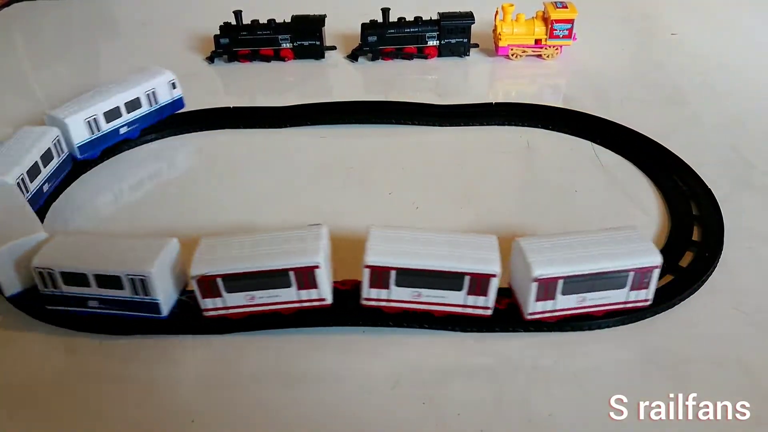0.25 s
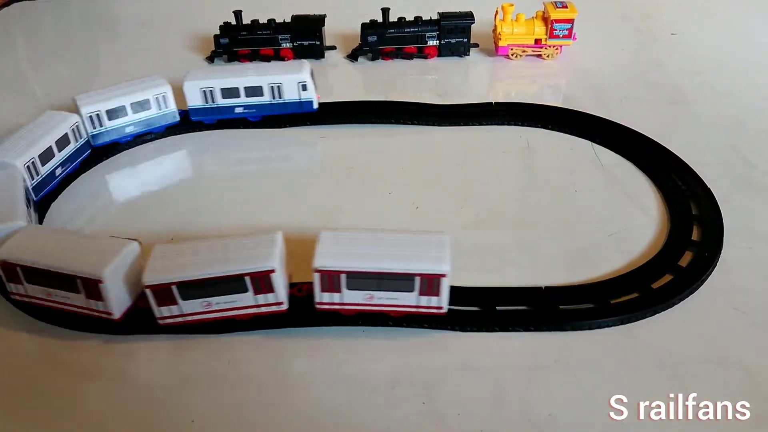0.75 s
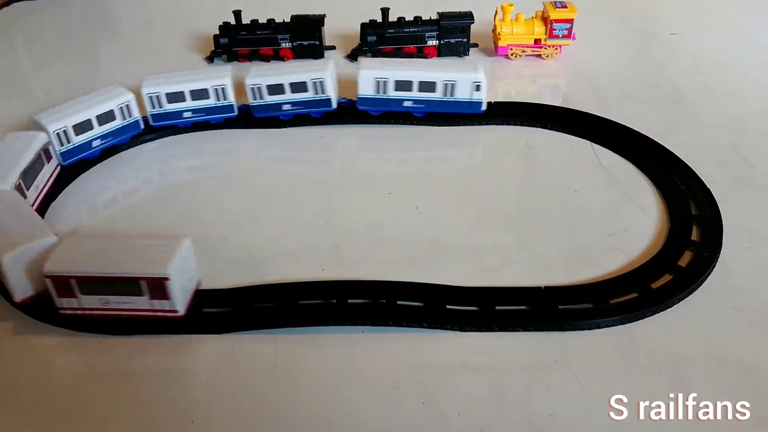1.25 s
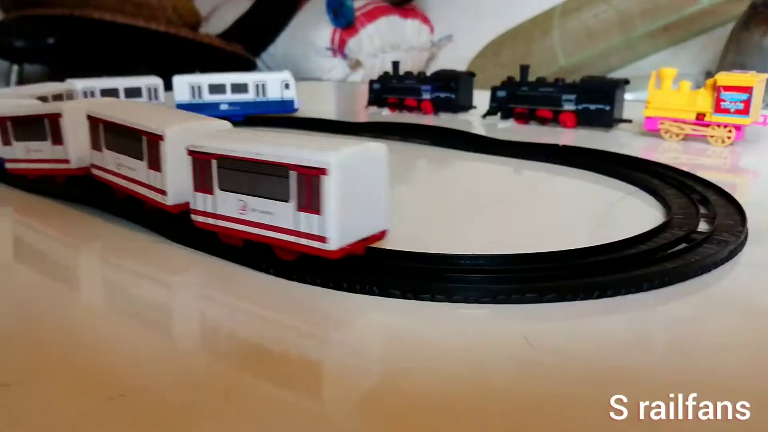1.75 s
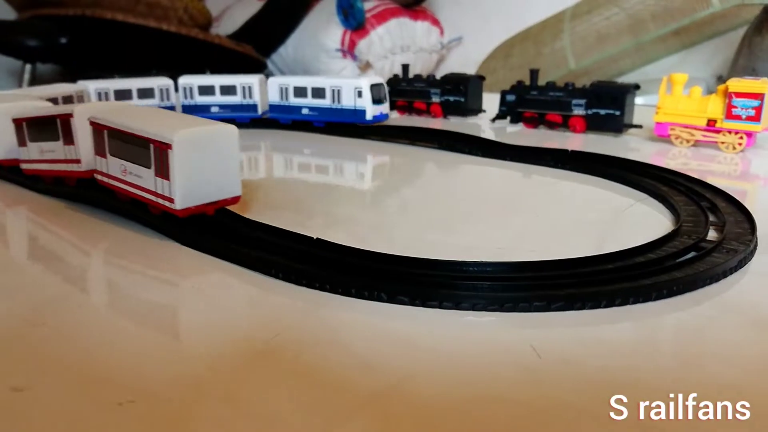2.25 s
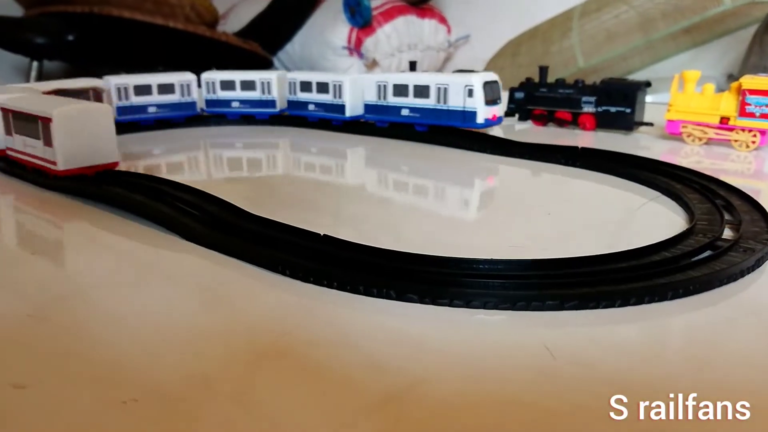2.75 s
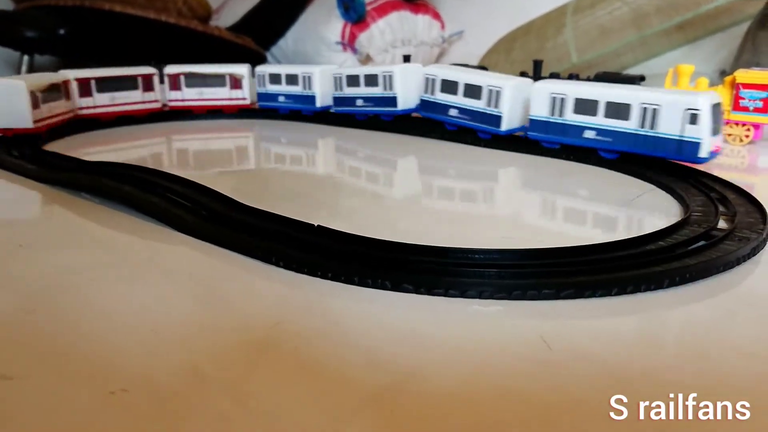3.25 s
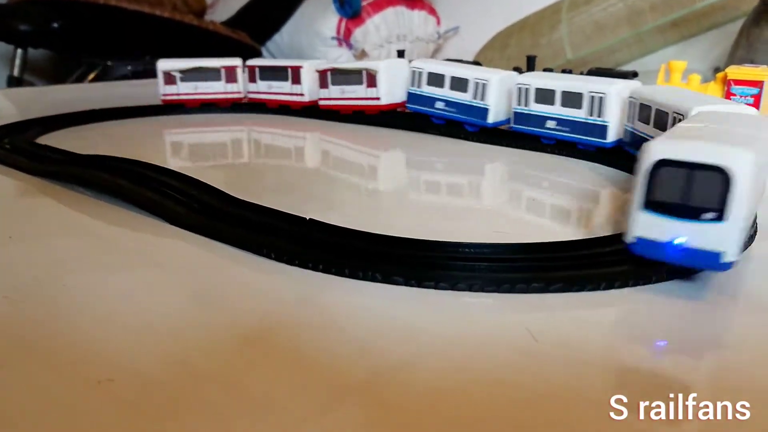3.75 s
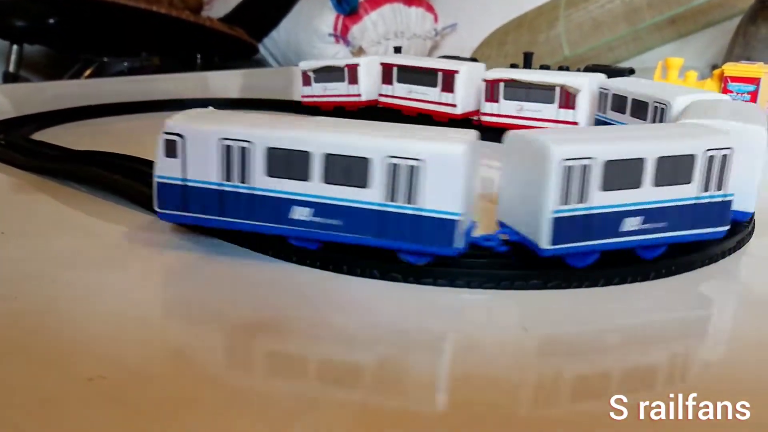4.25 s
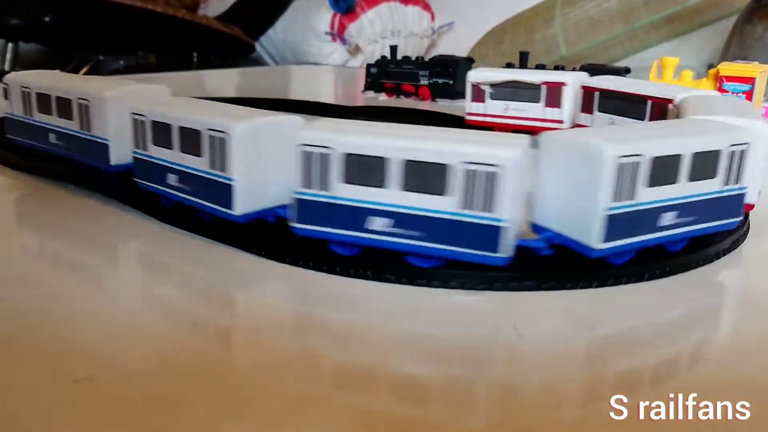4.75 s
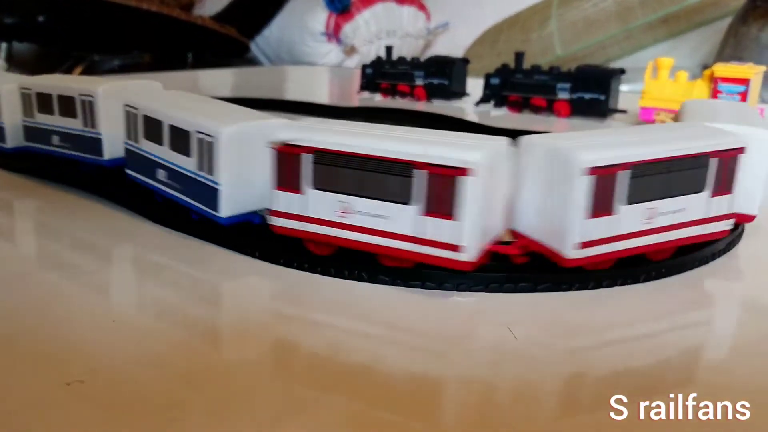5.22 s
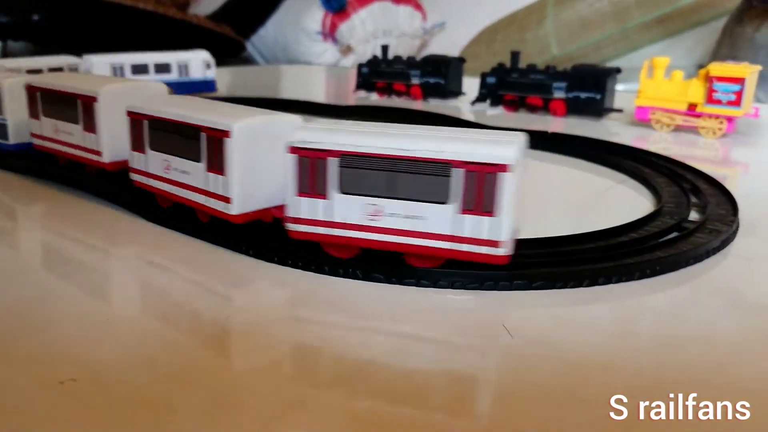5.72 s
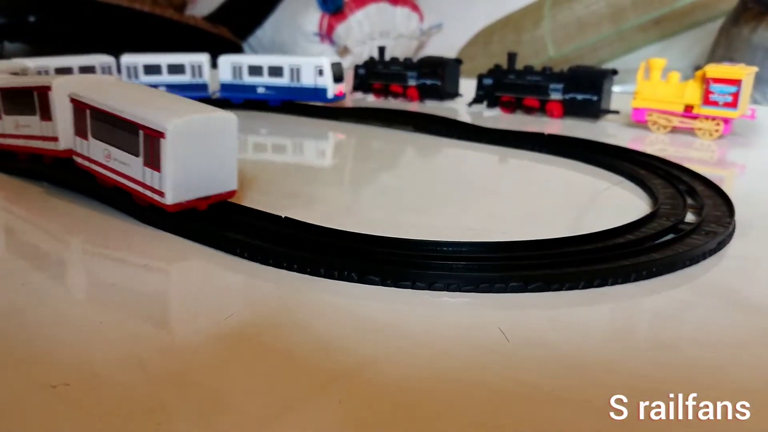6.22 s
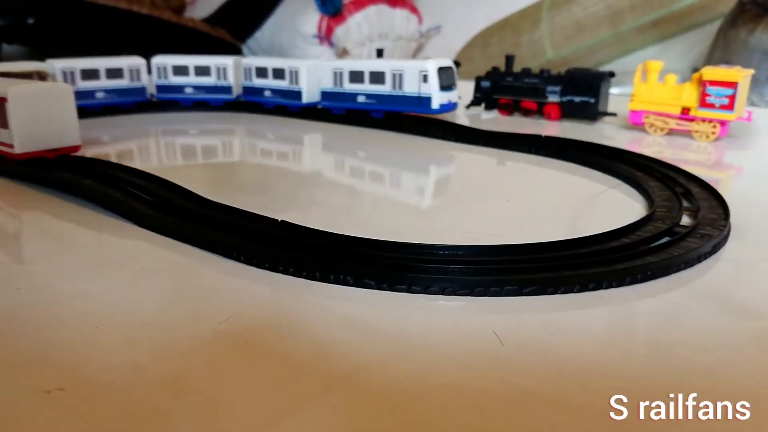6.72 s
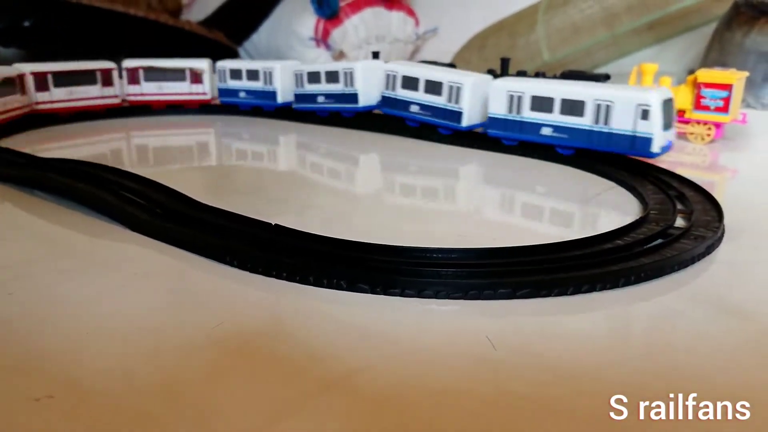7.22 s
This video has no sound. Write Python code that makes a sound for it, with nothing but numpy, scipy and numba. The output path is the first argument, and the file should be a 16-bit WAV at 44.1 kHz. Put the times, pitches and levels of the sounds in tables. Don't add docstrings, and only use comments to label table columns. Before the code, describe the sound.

Dense dry ticking of toy gears and hollow plastic cars circling a track on a hard surface, loudest mid-way as the train passes close by.

```python
import sys
import numpy as np
from scipy import signal
from scipy.fft import rfft, irfft
from scipy.io import wavfile
from scipy.ndimage import uniform_filter1d
from numba import njit

SR = 44100
rng = np.random.default_rng(int(sys.argv[2]) if len(sys.argv) > 2 else 0)


def field_ratio(decibels):
    return 10 ** (np.asarray(decibels, dtype=float) / 20)


def log_audio(samples):
    frames = np.atleast_2d(samples).T
    limited = np.clip(frames, -1, 1)
    pcm = np.round(limited * 32767).astype(np.int16)
    wavfile.write(sys.argv[1], SR, pcm)


N = 329868

# (frequency [Hz], width [Hz], level [dB])
FAN_LINES = [(92.9, 1.2, -46), (106.5, 0.91, -42), (147.5, 1.14, -48), (290.6, 6.62, -54)]
# (frequency [Hz], density [dB per Hz])
ROOM_AIR = [(15, -47), (25, -31), (54, -5.5), (81, 2), (102, -0.5), (125, -6), (190, -4.5), (232, -15),
            (400, -12.5), (520, -67.5), (880, -120)]
# (time [s], depth [dB], width [s])
HUM_FADES = [(.24, 15, 0.04), (1.58, 31, 0.18), (2.0, 21, 0.23), (2.55, 17, 0.08), (3.38, 30, 0.085),
             (3.95, 8, 0.041), (4.22, 8, 0.038), (4.62, 18, .07), (5.0, 26, 0.18), (5.58, 2, 0.18),
             (6.17, 24, 0.082), (7.17, 37, 0.063)]
# (frequency [Hz], width [Hz], level [dB])
SHELL_MODES = [(811, 150, -13.5), (1007, 100, -3.5), (1130, 114.5, 3), (1220.4, 270, 1), (1394, 437, -8.5)]
# (frequency [Hz], width [Hz], level [dB])
ROOF_MODES = [(1770, 270, 6), (2026, 182, 25), (2100, 1320, 14.5)]
# (frequency [Hz], density [dB per Hz])
TICK_COLOUR = [(1410, -24), (2400, 9), (3570, 5.5), (4220, 0.5), (4760, -6.5), (5930, -5.5), (6740, -7.5),
               (7330, -12.5), (10200, -18.5), (12000, -29.5), (13000, -65)]
# (frequency [Hz], density [dB per Hz])
TABLE_COLOUR = [(26, -29), (45, -3.5), (97, -3), (130, -7.5), (167, 0.5), (243, -7), (413, -8.5),
                (644, -8.5), (800, -4.5), (1040, -16.5), (1760, -120)]
# (time [s], level [dB])
MOTOR_NEARNESS = [(0, -26), (.6, -31), (1.15, -29), (1.71, -26), (1.74, -30), (1.87, -31), (1.94, -35),
                  (2.25, -34.5), (2.6, -32), (2.97, -32.5), (3.02, -28.5), (3.9, -25), (4.45, -25),
                  (4.85, -22.5), (5.4, -25), (6.25, -33), (7.33, -28), (7.48, -30)]
# (time [s], level [dB])
WHEEL_NEARNESS = [(0, -38.5), (.36, -37.5), (.55, -45), (1.7, -39.5), (1.76, -37.5), (1.87, -39.5),
                  (1.95, -47.5), (2.35, -47), (2.7, -43), (2.97, -41.5), (3.02, -41.5), (4.0, -38.5),
                  (4.8, -36.5), (5.4, -36.5), (5.7, -40.5), (5.95, -40), (6.15, -46), (7.48, -39)]
# (time [s], level [dB])
ROOF_FACING = [(0, -0.5), (.5, -2), (1.71, 1.5), (1.73, 1), (7.1, -0.5), (7.3, 2.5)]
# (time [s], level [dB])
JINGLE_LEVEL = [(0, -45), (.3, -43), (.45, -49), (.6, -70)]
# (centre [s], energy [dB], shell relative level [dB],
# length [ms])
JOINT_CLACKS = [(0.1036, -0.5, 6, 2.5), (0.1507, 2, -4, 3.8), (0.1556, -10, 1, 2.4),
                (0.271, 6, -3, 5.4), (0.2907, -2, 8, 2.5), (0.3081, 2.5, 3, 3.5), (0.3525, 0, 1, 2.9),
                (0.4557, -7, 1.0, 5.5), (0.5435, -10, 2, 2.5), (0.8231, -8, 3.0, 3.7),
                (0.9551, -2, 10, 2.9), (1.0234, -4.5, 8, 1.9), (1.0547, -8, 15, 6.4),
                (1.0855, -17, 9, 2.0), (1.1706, -9, 7, 4.0), (1.3049, -5, -6.0, 6.1),
                (1.3269, -6, 9, 5.8), (1.335, -6, 0, 5.0), (1.424, -20, 4, 2.5),
                (1.4602, -19, 9.0, 3.0), (1.4726, -18, -4.0, 3.0), (1.5749, -5.5, 6, 4.4),
                (1.6024, -15, 8, 4.5), (1.6725, -12, 0, 2.5), (1.7874, 3, 0, 4.6),
                (1.7928, 1, -4, 2.6), (1.8297, 6, -1, 7.4), (1.8428, -5, -2, 4.0),
                (2.003, -0.5, 4, 2.8), (2.0137, -14, 15, 2.5), (2.0232, -20, -3.0, 2.5),
                (2.0961, -6, 13, 2.8), (2.1057, -1, 8, 2.5), (2.117, 0, 0, 3.9), (2.1372, -5, 2, 1.7),
                (2.1773, -1, 1, 2.5), (2.1855, 1.5, -11, 1.8), (2.1997, -5, -2, 3),
                (2.397, -8, -3, 2.0), (2.5204, -6, -10.0, 2.2), (2.5614, -15, 3.0, 5.0),
                   (2.5685, -7, 10, 4.5), (2.5848, -5, -12.0, 2.7), (2.6006, -7, -1.0, 3.4),
                   (2.6155, -5.5, 2, 2.2), (2.6298, -1, 12, 3), (2.6497, -3, -4, 6.9),
                   (2.6911, -17, -7.0, 2.5), (2.6981, -2.5, 7.0, 2.3), (2.706, -15, -4, 3.0),
                   (2.734, -4, 11, 2.5), (2.7655, -9, 18, 3.0), (2.793, 4, 2, 2.5), (2.8032, -12, 10, 2.0),
                   (2.8608, -4, 12, 3.6), (3.0064, -3, 4, 3.2), (3.0156, -4, 8, 2.0), (3.0275, -1, 4, 2.7),
                   (3.0357, -1.5, 5, 2.5), (3.0483, -1, 9, 1.6), (3.073, -3, -3.0, 2.5), (3.0948, 1, -1, 7),
                   (3.1833, -8, 0.0, 3.9), (3.206, -9, -7.0, 3.0), (3.253, -6, 2.0, 5.0),
                   (3.3078, 2.5, 7.0, 3.5), (3.3505, 0.5, 10, 4), (3.461, -11.0, 7, 0.5),
                   (3.509, -1, -1, 4.5), (3.5964, -12, -8.0, 4.1), (3.601, -8.0, 2.0, 2.5),
                   (3.6468, -10, 7, 3.3), (3.6713, 0.5, 14, 2.7), (3.701, 2, 11, 2.8),
                   (3.7059, -5, -7, 2.3), (3.751, -4.5, 10.0, 1.8),
                (3.7679, -15, 1.0, 2.6), (3.8087, -7, 5, 3.0), (3.8218, -3, 14, 2.0),
                   (3.8273, 10.5, 7, 4.8), (3.845, -6, 4, 2.5), (3.8761, 8, 7.5, 3.0), (3.9248, 1, 10, 3.2),
                   (3.968, 3.5, 6.0, 2), (4.002, -7, -7, 2.5), (4.0186, 1.5, -1, 5.1),
                   (4.0356, -17, -5.0, 2.5), (4.0469, 7, -3, 3.0), (4.0587, 2, -8, 3.2),
                   (4.1381, 10, -2, 2.7), (4.1488, 5, 7, 2.5), (4.18, -9, -7.0, 3.0),
                   (4.2446, 5.5, -7.0, 2.5), (4.2585, -6, 12, 4.0), (4.27, -2, -6.0, 3.0),
                   (4.3112, 4, -4.0, 4.8), (4.3168, -5, 3, 2.0), (4.3315, -11, 11, 2.0),
                   (4.349, 0.5, 0, 3.5), (4.3755, -3.5, -6, 1.8), (4.485, 2, -5, 3.9),
                   (4.515, -6.0, 9, 4.0), (4.6486, -5.0, 4.0, 3.5), (4.7099, -3, 2, 3.0),
                   (4.7714, 1, -6.0, 2.8), (4.786, -6, 9, 2.0), (4.871, 3, 7, 4.5), (4.8857, -5, 8, 4.0),
                   (4.92, 0, 9.0, 4.0), (4.9443, 0, -7.0, 5.1), (5.101, -4.5, -8, 4.0),
                   (5.1457, -7.0, -4, 2.0), (5.163, -4, 10, 4.5), (5.2763, -3, -8.0, 2.5),
                (5.33, -2, 5, 3.0), (5.3663, -9, 6.0, 2.0), (5.407, -14, 3.0, 2.5), (5.4257, -2, 4, 3.0),
                   (5.448, -6, 7.0, 2.5), (5.459, -2, -8.0, 4.4), (5.468, -7, -5.0, 4.5),
                   (5.518, -17, 0, 3.0), (5.6711, -0.5, 0, 9.8), (5.7248, -10.0, 13, 2.5),
                   (5.795, -12, 12, 4.5), (5.8709, -11.0, 6, 2.5), (5.8764, -4, 8, 2.5),
                   (5.8895, -2.5, 5, 3.2), (5.975, -4, -8.0, 4.0), (6.271, -8, 3, 2.7),
                   (6.4836, -10, 0.0, 3.5), (6.516, -11, 14, 4.1), (6.5728, -20, -6.0, 2.5),
                   (6.5963, -9, 8, 2.5), (6.6017, -8, 9, 2.2), (6.6494, -3, 6, 2.2), (6.718, -11, 11, 3.5),
                   (6.742, -15, -8, 2.5), (6.7504, -4, 12, 2.5), (6.7743, -5, -9.0, 5.0),
                   (6.814, -8, 13, 2.3), (6.8446, -5, 11.0, 2.2), (6.88, -20, 4, 4), (6.889, -5, -1, 2),
                   (7.1151, -5, 2, 2), (7.1473, 8.5, 3.0, 5), (7.233, -3, 6.0, 2.2),
                   (7.2384, -2, -7.0, 2.0), (7.254, -5, 1, 3.4), (7.2636, 5, 4, 3.6), (7.294, -2, 5, 4.0),
                (0.141, -8, -2, 3.5), (0.335, -5, 0, 6), (0.44, -14, 0, 4), (3.2995, -1, 2, 4),
                  (3.865, -7, 0, 1.5), (3.8794, 4, 5, 2), (3.907, -1, 2, 3), (4.281, -8, 1, 1.5),
                  (7.123, -4, -3, 2.5), (7.21, -4, 2, 5), (7.275, -10, 0, 2), (7.42, -8, 17, 3)]
# (time [s], peak [dB], frequency [Hz])
RIM_SNAPS = [(0.232, -21, 1130), (0.94, -13, 1210), (1.083, -23, 1110), (1.24, -17, 1280),
             (1.32, -13, 1080), (1.5, -17, 1120), (1.736, -23.5, 1190), (1.831, -17, 1230),
             (2.137, -19, 1290), (2.567, -17, 1200), (2.697, -22, 1200), (2.764, -17, 1170),
             (3.34, -14, 1190), (3.458, -17, 1210), (3.566, -17, 1090), (3.607, -13, 985), (3.7, -10, 1040),
             (3.735, -21, 1025), (3.749, -14, 1330), (3.809, -12, 1100), (3.826, -14, 1130),
             (3.866, -9, 1200), (3.878, -6.5, 1130), (3.923, -9, 1070), (3.968, -14, 1080),
             (4.016, -13, 1190), (4.043, -17, 1040), (4.214, -18, 1070), (4.26, -12, 1160),
             (4.284, -15, 958), (4.395, -10, 1180), (4.414, -10, 1110), (4.617, -14, 1150),
             (4.704, -20, 1170), (4.755, -15, 1100), (4.777, -10, 1100), (4.851, -11, 1090),
             (4.884, -14, 996), (4.903, -10, 1090), (4.927, -9, 1140), (4.957, -17, 1000),
             (4.981, -13, 1220), (5.135, -8.5, 1070), (5.258, -15, 1080), (5.471, -21, 1150),
             (5.504, -16, 1160), (5.589, -16, 1200), (5.645, -16, 1180), (6.447, -15.5, 1040),
             (6.516, -19, 1100), (6.595, -24, 1090), (6.716, -21, 1200), (6.749, -19, 1060),
             (6.886, -19, 1170), (7.043, -15, 1130), (7.148, -12, 1140), (7.232, -18, 1180),
             (7.263, -21, 1150), (7.29, -18, 1120), (7.303, -10, 1200),
             (2.731, -23, 1130),
    (3.003, -20, 1270),
    (3.871, -9, 1020),
    (4.783, -14, 1100),
    (4.796, -12, 1080),
    (4.815, -16, 1170),
    (4.866, -14, 980),
    (7.317, -13, 1350),
    (7.335, -14, 1070),
]
# (time [s], energy [dB])
COUPLING_JOLTS = [(0.2479, -4), (0.26, 1), (0.5574, 0), (0.5907, -7), (0.604, -3), (0.701, 5), (0.849, 2),
                  (0.894, 6), (0.9164, 8), (0.9403, 0), (0.9664, 6), (1.013, 2), (1.104, -6), (1.2467, -4),
                  (1.3883, -4), (1.501, 6), (1.7073, -2), (1.8003, 6), (2.25, -5), (2.334, -8), (2.4436, 1),
                  (2.547, 0), (2.7373, 0), (3.1, -4), (3.1897, 9), (3.34, 5), (3.356, 8), (3.3752, 7),
                  (3.465, 1), (3.524, 6), (3.5674, 8), (3.6058, 11), (4.2322, 8), (4.3956, 0), (4.413, 5),
                  (4.615, 5), (4.7552, 4), (4.7976, 8), (4.903, 3), (4.9258, 0), (5.171, 0), (5.3865, 6),
                  (5.5564, -10), (5.5895, 0), (5.6442, -4), (5.661, -3), (5.8813, 2), (5.9093, 5),
                  (6.035, 3), (6.103, -7), (6.157, -9), (6.206, 1), (6.3533, -1), (6.4472, -5),
                  (6.6663, -7), (6.73, -7), (6.866, -4), (7.04, 5), (7.2093, 3), (7.3017, 13)]
# (time [s], level [dB], frequency [Hz])
TABLE_THUDS = [
    (1.752, -23, 110),
    (1.793, -26, 142),
    (1.83, -18.5, 157),
    (2.42, -26, 139),
]
# (start [s], length [s], level [dB], frequency [Hz])
AXLE_SQUEAKS = [
    (3.283, 0.042, -69, 15500),
    (4.129, 0.068, -65, 15600),
    (4.232, 0.032, -74, 14700),
    (4.364, 0.066, -61, 15500),
    (4.869, 0.074, -59, 15400),
]
# (frequency [Hz], left minus right [dB])
PORT_DIFFERENCE = [(60, -5), (110, -5), (200, -5.5), (380, -4.5), (700, -5), (1290, -6.5), (2380, 0.5),
                   (4400, -8.5), (8120, 2.5), (15000, 4.5)]
# (frequency [Hz], share [0-1])
TREBLE_LOSS = [(6500, 0), (8000, .1), (9500, .22), (10500, .45), (11300, .62), (12200, .78), (12800, .97)]
# low edge, high edge [Hz]
MIC_BAND = [48, 12400]

CHANGE_S = 1.7207
ROOF_DB, TICK_DB, TABLE_DB = (4.23, 1.73), (5, 6.16), (0, 3)
ROOF_FROM_WHEELS = 0.75
LAG_MS = -0.16


def unit(x):
    return x / np.sqrt(np.mean(x ** 2))


@njit
def svf(x, hz, width):
    y, b, l = np.empty(len(x)), 0., 0.
    g, k = np.tan(np.pi * hz / SR), width / hz
    for i in range(len(x)):
        v = (b + g * (x[i] - l)) / (1 + g * (g + k))
        b, l, y[i] = 2 * v - b, l + 2 * g * v, k * v
    return y


def ring(x, modes):
    return sum((-1) ** k * field_ratio(db) * svf(x, 1. * f, 1. * w) for k, (f, w, db) in enumerate(modes))


def ring_twice(x, hz, width):
    return ring(ring(x, [(hz, width, 0)]), [(hz, width, 0)])


def colour(x, points, ends=-120., size=4096):
    hz, db = np.transpose(points)
    f = np.log(np.arange(size // 2 + 1) * SR / size + 1)
    if ends:
        hz, db = np.r_[hz[0] / 2, hz, hz[-1] * 2], np.r_[ends, db, ends]
    cepstrum = irfft(np.interp(f, np.log(hz), db) * np.log(10) / 20)
    cepstrum[1:size // 2] *= 2
    cepstrum[size // 2 + 1:] = 0
    return signal.fftconvolve(x, irfft(np.exp(rfft(cepstrum))))[:N]


def walk(rate):
    place = np.arange(N) * rate / SR
    levels = rng.standard_normal(int(place[-1]) + 2)
    k = place.astype(int)
    part = place - k
    ease = part * part * (3 - 2 * part)
    return 1.15 * (levels[k] + (levels[k + 1] - levels[k]) * ease)


def follow(curve):
    return np.interp(np.arange(N) / SR, *np.transpose(curve))


def wavering(hz, width, sway_db=-0.44):
    turns = np.cumsum(hz + width * walk(9) / 2) / SR + rng.random()
    return unit(field_ratio(sway_db * walk(6.9)) * np.sin(2 * np.pi * turns))


def fan():
    t = np.arange(N) / SR
    fade_db = sum(db * np.exp(-((t - s) / wide) ** 2) for s, db, wide in HUM_FADES)
    lines = sum(field_ratio(db) * wavering(hz, width) for hz, width, db in FAN_LINES)
    lines = lines + field_ratio(-41.5 - fade_db) * wavering(176.3, 2.34, sway_db=1.0)
    mid, side = (field_ratio(-43) * unit(colour(rng.standard_normal(N), ROOM_AIR)) for _ in range(2))
    apart = field_ratio(-7.5) * side + field_ratio(-19.0) * np.roll(lines, N // 3)
    return lines + mid + apart * np.array([[1], [-1]])


def ticks(rate, scatter_db, hiss, patchy_db):
    hit = rng.random(N) < rate / SR
    size = field_ratio(scatter_db * np.minimum(rng.exponential(size=N), 3))
    scrape = np.convolve(hit * size, np.hanning(40), "same") * rng.standard_normal(N)
    return field_ratio(patchy_db * walk(16)) * (unit(scrape) + hiss * rng.standard_normal(N))


def rolling(shell_db, roof_db, tick_db, table_db):
    contact = ticks(600, scatter_db=3, hiss=.6, patchy_db=.9)
    shell = unit(ring(ring(contact, [(1120, 1100, 0)]), SHELL_MODES))
    roof = unit(ring(ring(contact, [(1910, 1230, 0)]), ROOF_MODES))
    direct = unit(colour(contact, TICK_COLOUR))
    table = unit(colour(contact + 2.77 * rng.standard_normal(N), TABLE_COLOUR))
    over_shell = field_ratio(roof_db) * roof + field_ratio(tick_db) * direct + field_ratio(table_db) * table
    return field_ratio(shell_db) * (shell + over_shell)


def jingle():
    def one_port():
        small = ticks(250, scatter_db=3, hiss=.3, patchy_db=2)
        return unit(ring(small, [(3520, 360, -2), (4270, 500, 0)]))
    return field_ratio(follow(JINGLE_LEVEL)) * np.array([one_port() for _ in range(2)])


def chatter():
    luck = rng.random((int(30 * N / SR), 4))
    s = luck[:, 0] * N / SR
    near_db = np.interp(s, *np.transpose(WHEEL_NEARNESS))
    energy_db = near_db + 18.5 - 5 * np.log(luck[:, 1] + 0.1)
    shell_db = 1 + 16 * (luck[:, 2] - .5)
    return np.c_[s, energy_db, shell_db, 2.9 * 3 ** luck[:, 3]]


def hollow(x):
    return ring(ring(x, [(1200, 820, 0)]), [(1080, 150, 15.6), (1214, 130, 17.7), (1440, 430, 14.0)])


def clacks():
    clear = np.array(JOINT_CLACKS)
    clear = clear + [0, -4.5, 0, 0]
    s, energy_db, shell_db, ms = np.vstack([clear, chatter()]).T
    span = np.clip(.45 * ms, .3, 4)[:, None] * SR / 1000
    age = (np.arange(800) - 400) / span
    bursts = rng.standard_normal((len(s), 800)) ** 5 * np.exp(-age ** 2 / 2)
    bursts = uniform_filter1d(bursts, size=2, axis=1)
    bursts /= np.sqrt((bursts ** 2).sum(axis=1, keepdims=True))
    at = np.maximum(s[:, None] * SR - 405, 0).astype(int) + np.arange(800)
    crack, shell = np.zeros((2, N + 800))
    np.add.at(crack, at, field_ratio(energy_db)[:, None] * bursts)
    np.add.at(shell, at[:, 350], field_ratio(np.minimum(energy_db + shell_db, energy_db / 2 + 4)))
    crack = crack[:N]
    bright = field_ratio(-1.0) * colour(crack, TICK_COLOUR)
    for hz, db in [(1500, 1.0), (2700, -7.5), (3900, -2.5), (5500, -9.5)]:
        bright = bright + field_ratio(db) * ring_twice(crack, hz, 2200)
    return bright + hollow(shell[:N]) + field_ratio(3.5) * colour(crack, TABLE_COLOUR)


def snaps():
    s, db, hz = np.transpose(RIM_SNAPS)[:, :, None]
    age = np.arange(600) / SR
    rise_ms, fall_ms = 0.83, 2
    shape = (1 - np.exp(-(1000 * age / rise_ms) ** 2)) * np.exp(-1000 * age / fall_ms)
    at = (s * SR).astype(int) + np.arange(600)
    body, edge = np.zeros((2, N + 600))
    np.add.at(body, at, field_ratio(db - 2.5) * shape / shape.max() * np.sin(2 * np.pi * hz * age))
    np.add.at(edge, at[:, 30], field_ratio(db[:, 0] - 4))
    edge = edge[:N]
    return body[:N] + ring(edge, [(2200, 2000, 0)]) + ring(edge, [(5000, 3500, -7)])


def knocks():
    s, db = np.transpose(COUPLING_JOLTS)
    jolts = np.zeros(N)
    np.add.at(jolts, (s * SR).astype(int), field_ratio(db - 6))
    return hollow(jolts)


def bumps():
    t, out = np.arange(N) / SR, 0
    for s, db, hz in TABLE_THUDS:
        age = np.maximum(t - s, 0)
        out = out + field_ratio(db) * np.sin(2 * np.pi * hz * age) * np.exp(-age / 0.0082)
    return out


def squeaks():
    out = np.zeros(N)
    for s, long, db, hz in AXLE_SQUEAKS:
        hiss = ring_twice(rng.standard_normal(4096), hz, 600)[:int(long * SR) + 600]
        at = int(s * SR) - 450
        out[at:at + len(hiss)] += field_ratio(db + 1.5) * np.hanning(len(hiss)) * unit(hiss)
    return out


def ports(x, lag_ms, pan_db, wet, t60, size=4096):
    t = np.arange(size) / SR
    late = np.interp(np.arange(N) - lag_ms * SR / 1000, np.arange(N), x)
    count = N // size + 2
    padded = np.pad(x, (size, 2 * size))
    pieces = np.lib.stride_tricks.sliding_window_view(padded, 2 * size)[::size][:count]
    tails = rng.standard_normal((2, count, size)) * field_ratio(-60 * t / t60) * np.minimum(t / 0.0016, 1)
    tails /= np.sqrt((tails ** 2).sum(axis=2, keepdims=True))
    faded = pieces[None] * np.sqrt(np.hanning(2 * size))
    wets = signal.fftconvolve(np.float32(faded), np.float32(tails), axes=2)
    echo = np.zeros((2, (count + 4) * size))
    for k in range(count):
        echo[:, k * size:k * size + wets.shape[2]] += wets[:, k]
    mix = np.sqrt(1 - wet) * np.array([late, x]) + np.sqrt(wet) * echo[:, size:size + N]
    return mix * field_ratio(np.array([pan_db, -pan_db]) / 2)


def scene():
    room = fan()
    motor_db = follow(MOTOR_NEARNESS)
    wheels_db = follow(WHEEL_NEARNESS) - motor_db
    later = (np.arange(N) / SR > CHANGE_S).astype(int)
    roof_db = ROOF_FROM_WHEELS * wheels_db + np.take(ROOF_DB, later) + follow(ROOF_FACING)
    tick_db = wheels_db + np.take(TICK_DB, later)
    table_db = wheels_db + np.take(TABLE_DB, later)
    levels = (motor_db + 2.5, roof_db, tick_db, table_db)
    pan_db = np.full(N, -1.1)
    front = ports(rolling(*levels), LAG_MS, pan_db, wet=0.36, t60=0.07)
    rear = ports(rolling(*levels), LAG_MS + 0.083, pan_db, wet=0.44, t60=0.15)
    hits = clacks() + snaps() + knocks()
    hit_pan_db = 5.5 * walk(42)
    hits = ports(hits, LAG_MS + 0.073, hit_pan_db, wet=0.1, t60=0.045)
    return field_ratio(-4.0) * front + field_ratio(-5.0) * rear + hits + room + bumps() + jingle()


def starve(x, size=2048, count=12):
    f, _, z = signal.stft(x, SR, nperseg=size, noverlap=size // 2)
    share = np.interp(f, *np.transpose(TREBLE_LOSS))[:, None]
    chance = rng.random((len(f) // count + 1, z.shape[2]))
    chance = np.repeat(chance, count, axis=0)[:len(f)]
    kept = (chance > share) / np.sqrt(1 - share)
    return signal.istft(z * kept, SR, nperseg=size, noverlap=size // 2)[1][:, :N]


def low_pass(x):
    return signal.sosfilt(signal.butter(12, 15800, fs=SR, output="sos"), x)


def record(dry):
    hz, db = np.transpose(PORT_DIFFERENCE)
    left = colour(dry[0], np.c_[hz, db / 2], ends=0)
    right = colour(dry[1], np.c_[hz, -db / 2], ends=0)
    x = np.array([left, right])
    x = .8 * np.tanh(x / .8)
    x = signal.sosfilt(signal.butter(3, MIC_BAND[0], "high", fs=SR, output="sos"), x)
    x = signal.sosfilt(signal.ellip(8, .5, 50, MIC_BAND[1], fs=SR, output="sos"), x)
    treble = signal.butter(4, 4200, "high", fs=SR, output="sos")
    lost = .38 * signal.sosfiltfilt(treble, x[0] - x[1]) / 2
    x = starve(x - lost * np.array([[1], [-1]]))
    x = x + squeaks()
    t = np.arange(N) / SR - CHANGE_S
    back = np.clip((t - .005) / .012, 0, 1)
    mix = x * np.where(t < 0, 1, back + (1 - back) * field_ratio(-24))
    mix[:, int(1.7447 * SR)] += field_ratio(-30)
    return low_pass(mix)


dry = scene()
out = record(dry)
log_audio(out)
```